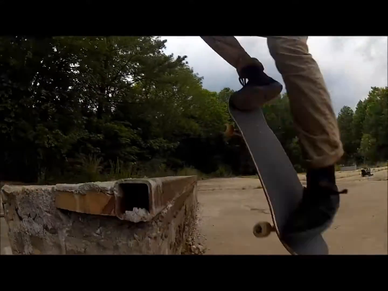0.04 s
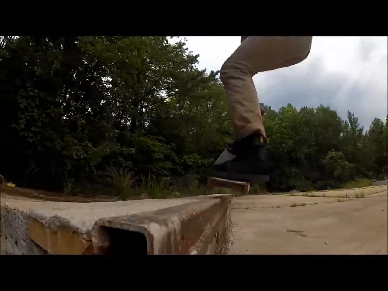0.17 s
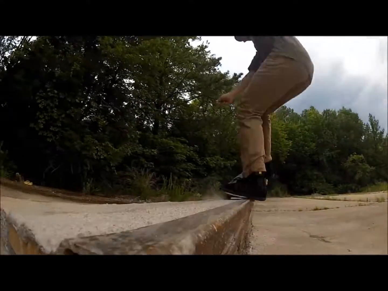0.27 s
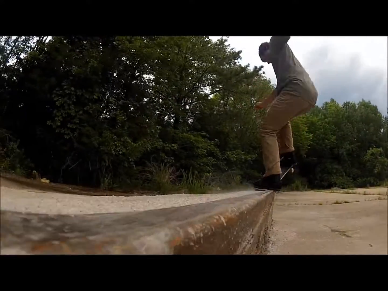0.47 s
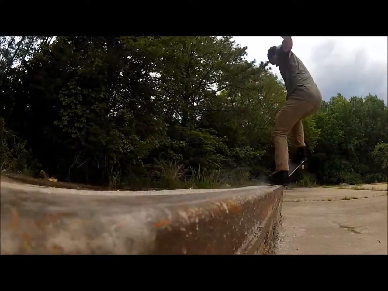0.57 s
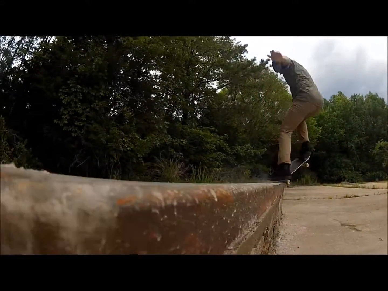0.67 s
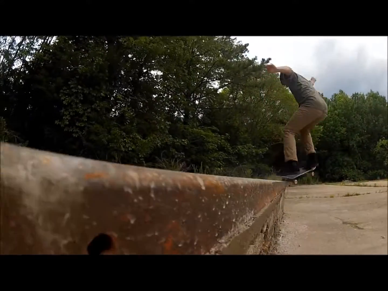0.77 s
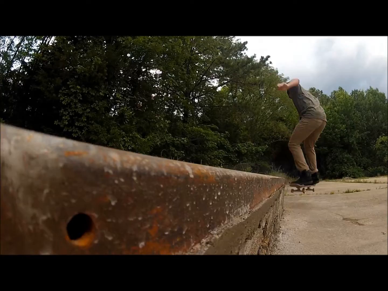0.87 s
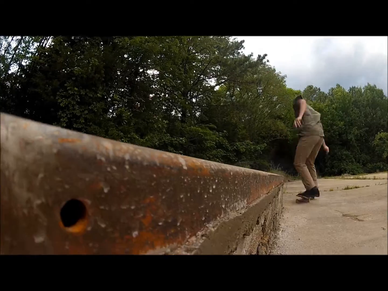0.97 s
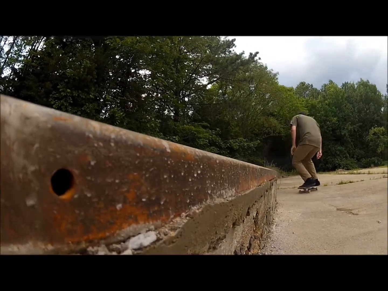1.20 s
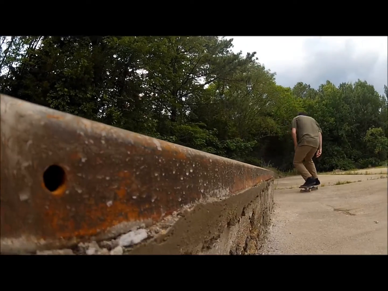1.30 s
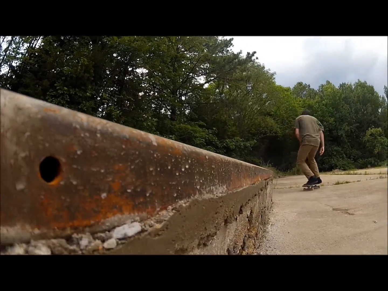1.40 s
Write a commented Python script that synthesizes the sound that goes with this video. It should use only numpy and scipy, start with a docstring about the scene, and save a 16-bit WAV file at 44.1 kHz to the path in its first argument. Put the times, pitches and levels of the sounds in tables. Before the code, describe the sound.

A skateboard slams onto a steel-edged ledge, grinds along it, then lands with a clack.

```python
"""An open yard in a light wind, one microphone near a concrete ledge with a steel edge.
A skateboard is already in the air, wheels whirring, trucks rattling. At 0.22 s truck and wheels slam
onto the steel; the grind scrapes through the board, the ledge rumbles and stick-slip makes the metal
sing. The board drops off, clacks onto the concrete at 0.95 s, bounces once and rolls away with the
tick of a pebble and a faint skid. Little comes back from the yard."""
import sys
import numpy as np
from scipy import signal
from scipy.fft import rfft, irfft
from scipy.io import wavfile

SR = 44100
rng = np.random.default_rng(int(sys.argv[2]) if len(sys.argv) > 2 else 0)


def generate_wav(sig):
    """Save sig (samples, or channels by samples) to the path in sys.argv[1] as 16-bit PCM at SR."""
    pcm = np.round(np.clip(np.atleast_2d(sig).T, -1, 1) * 32767).astype(np.int16)
    wavfile.write(sys.argv[1], SR, pcm)


N = 63945
FFT_SIZE = 81920
HZ, T = np.fft.rfftfreq(FFT_SIZE, 1 / SR) + 1e-3, np.arange(N) / SR
SLAM_S = 0.224  # first touch on the steel

# The board's resonances. Each row: frequency in Hz, width in Hz, dB over the plain sound.
BOARD_MODES = [(1129, 228, 15), (2081, 258, 13), (2262, 83, 17.5), (3472, 227, 11.5), (8420, 152, 12.5),
               (9777, 165, 17.5), (10800, 117, 14.5), (13330, 250, 16), (14300, 210, 24)]


def amp(db):
    """Decibels to gain."""
    return 10 ** (np.asarray(db) / 20)


def unit(x):
    """Scales to an rms of one."""
    return x / np.sqrt(np.mean(abs(x) ** 2) + 1e-20)


def read(points, hz):
    """Reads a table on a log-frequency axis."""
    f, value = np.transpose(points)
    return np.interp(np.log(hz + 1), np.log(f), value)


def level(points):
    """Gain along a level curve, falling 200 dB a second beyond its ends."""
    s, db = np.transpose(points)
    outside_s = np.maximum(np.maximum(s[0] - T, T - s[-1]), 0)
    return amp(np.interp(T, s, db) - 200 * outside_s)


def resonances(modes):
    """Summed response of damped modes."""
    return sum(amp(db) / (1 + 1j * (HZ ** 2 - hz ** 2) / (HZ * width)) for hz, width, db in modes)


def body(colour, modes=()):
    """Causal response of a contact colour and the modes it rings."""
    log_gain = np.log(amp(read(colour, HZ)))
    phase = -signal.hilbert(np.r_[log_gain, log_gain[-2:0:-1]]).imag[:len(HZ)]
    return np.exp(log_gain + 1j * phase) * (1 + resonances(modes))


def through(x, response):
    """Filters without changing the power of white noise."""
    return irfft(rfft(x, FFT_SIZE) * unit(response))[:N]


def drift(rate_hz):
    """Random motion up to about this rate, with an rms of one."""
    return unit(irfft(rfft(rng.standard_normal(FFT_SIZE)) / (1 + (HZ / rate_hz) ** 4))[:N])


def waver(rate_hz, depth_db):
    """Randomly wavering gain."""
    return amp(depth_db * drift(rate_hz))


def swell(s, half_s, db):
    """Bell-shaped gain that peaks at time s."""
    return amp(db) * np.exp(-((T - s) / half_s) ** 2)


def grit(smooth, grains_per_s=4500, spread_db=3):
    """Rough surfaces rubbing: tiny impacts of uneven size over smooth friction noise."""
    size = amp(spread_db * np.minimum(rng.exponential(1, N), 4))
    grains = size * rng.choice([-1, 1], N) * (rng.random(N) < grains_per_s / SR)
    return unit(grains) + smooth * rng.standard_normal(N)


def blows(rows, response, thud_hz=856, treble_hz=3000, rise_s=0.00067):
    """Each blow is a smooth push and a brief chatter of the contact, ringing one body."""
    out = np.zeros(N)
    treble = 1j * HZ / (treble_hz + 1j * HZ)
    thud = amp(1.5) / (1 + 1j * HZ / thud_hz) ** 2
    above_thud = 1j * HZ / (thud_hz + 1j * HZ)
    for s, db, decay_s, treble_db in rows:
        chatter = rng.standard_normal(N) * np.exp(-T / decay_s) * (1 - np.exp(-T / rise_s))
        force = thud + rfft(chatter / np.linalg.norm(chatter), FFT_SIZE) * above_thud
        shelf = 1 + (amp(treble_db) - 1) * treble
        sound = irfft(force * response * shelf)[:N]
        start = round(s * SR)
        out[start:] += amp(db) * sound[:N - start] / np.linalg.norm(sound)
    return out


def wind():
    """Light wind on the microphone and in the trees."""
    # The wind's spectrum. Each row: frequency in Hz, gain in dB.
    colour = [(10, -7), (35, 2), (60, -1.5), (110, -12), (300, -21), (4000, -40), (15000, -52.5)]
    # Gusts and lulls. Each row: time in seconds, level in dB.
    gusts = [(0, -51.5), (.53, -51.5), (.79, -50), (.93, -54), (1.08, -53.5), (1.16, -60.5), (1.225, -48.5),
             (1.29, -53), (1.45, -51.5)]
    return unit(through(rng.standard_normal(N), body(colour))) * level(gusts)


def yard(x, rise_s=0.0055):
    """Scatter that reaches the microphone from the ground and the trees."""
    # Each row: frequency in Hz, seconds to die away by 60 dB.
    decay = [(150, 1), (1000, 0.086), (4000, 0.54), (12000, 0.3)]
    hz, t, noise = signal.stft(rng.standard_normal(SR // 2), SR, nperseg=256)
    tail = signal.istft(noise * amp(-60 * t / read(decay, hz)[:, None]), SR, nperseg=256)[1]
    tail *= np.minimum(T[:len(tail)] / rise_s, 1)
    return signal.fftconvolve(x, tail / np.linalg.norm(tail))[:N]


def pebble(ring_hz=6000, width_hz=1100):
    """A grain of stone ticks under a wheel."""
    tick = rng.standard_normal(N) * swell(s=1.1455, half_s=0.0025, db=-56)
    return through(tick, resonances([(ring_hz, width_hz, 0)]) ** 2)


def skids():
    """The wheels slide sideways for a moment and squeal faintly."""
    # Brief slides. Each row: centre in seconds, half length in seconds, level in dB.
    slides = [(0.435, 0.024, -55), (0.526, 0.056, -54.5), (0.625, 0.013, -53), (0.669, 0.03, -62),
              (1.172, 0.0063, -62), (1.199, 0.024, -57)]
    # A sliding wheel's squeal. Each row: frequency in Hz, width in Hz, relative level in dB.
    squeal = [(3020, 410, 2.5), (4330, 370, 6), (7300, 530, -2.5)]
    pressure = sum(swell(*slide) for slide in slides)
    return through(unit(grit(smooth=0.32)) * pressure, resonances(squeal))


def spinning_wheels():
    """Free wheels whirr through the board, fading until the landing stops them."""
    # The whirr's spectrum. Each row: frequency in Hz, gain in dB.
    colour = [(80, -11), (200, -5), (500, -18.5), (1100, -9), (1550, -9), (2200, -5), (4000, -8.5),
              (6000, -17), (9000, -11.5), (12000, -32.5), (14500, -24)]
    # Its fade. Each row: time in seconds, level in dB.
    fade = [(0, -44), (.06, -47), (.13, -46), (.21, -52), (.5, -56.5), (.93, -62.5), (.96, -90)]
    whirr = unit(grit(smooth=3.2) * waver(66, depth_db=3.3)) * level(fade)
    return through(whirr, body(colour, BOARD_MODES))


def rattles():
    """Loose trucks knock lightly on the board, in the air and as it rolls off."""
    # The knocks. Each row: start in seconds, energy in dB, chatter decay in seconds, treble in dB.
    knocks = [(.001, -12.5, 0.012, -5.5), (.012, -14, 0.043, 7), (.0665, -13.5, 0.005, -5),
              (.085, -18, 0.0068, -3), (.095, -30, 0.0044, -1), (.138, -25, 0.0023, -13),
              (1.176, -25.5, 0.0053, -6), (1.345, -33.5, 0.021, -16)]
    # Their spectrum. Each row: frequency in Hz, gain in dB.
    colour = [(100, -1), (500, -2), (1300, -10.5), (2200, -5), (5500, -3), (9000, -8), (14500, -40)]
    return blows(knocks, body(colour, BOARD_MODES))


def landing():
    """The wheels clack onto the concrete, bounce once and roll away from the microphone."""
    # Wheel impacts. Each row: start in seconds, energy in dB, chatter decay in seconds, treble in dB.
    clack_blows = [(.9405, -21.5, .003, -12), (.9458, -1, 0.0026, 14), (.9485, 4, 0.0027, -3),
                   (.9525, 1.5, 0.0011, 9), (.958, -2.5, 0.0018, 10), (.9635, -6.5, 0.0089, 4)]
    bounce_blows = [(1.048, -19, 0.003, -6), (1.0575, -11.5, 0.0039, -3)]
    # The deck's ring under the rider at each touchdown. Each row: frequency in Hz, width in Hz, gain in dB.
    clack_modes = [(460, 60, 12), (1150, 70, 15), (1225, 65, 20), (1490, 28, 11), (1632, 24, 11),
                   (2165, 65, 18), (2440, 30, 7), (3560, 70, 19), (3700, 28, 19)]
    bounce_modes = [(598, 55, 24), (1009, 59, 26), (3575, 60, 22)]
    # Spectra of wheels on concrete. Each row: frequency in Hz, gain in dB.
    clack_colour = [(60, -10), (150, 2.5), (400, 4), (750, -3), (1300, -5), (2500, -2), (4000, -16.5),
                    (6000, -18.5), (9000, -12), (12000, -24), (14500, -25)]
    bounce_colour = [(100, -15), (400, -2.5), (800, -8), (2500, -3), (4000, -8), (6000, -8.5), (7500, -4.5),
                     (14500, -22)]
    roll_colour = [(80, -21), (200, 0), (500, -1.5), (1100, -12), (2200, -14), (4000, -17), (6000, -16.5),
                   (9000, -20.5), (12000, -36), (14500, -32.5)]
    # The receding roll. Each row: time in seconds, level in dB.
    roll_fade = [(.945, -62), (.96, -43.5), (1.01, -52.5), (1.1, -57), (1.2, -55.5), (1.28, -64),
                 (1.45, -64.5)]
    clack = blows(clack_blows, body(clack_colour, BOARD_MODES + clack_modes))
    bounce = blows(bounce_blows, body(bounce_colour, BOARD_MODES + bounce_modes))
    roll = unit(grit(smooth=0.59) * waver(74, depth_db=1.5)) * level(roll_fade)
    return clack + bounce + through(roll, body(roll_colour, BOARD_MODES))


def thump(hz=208, db=-31.5, swell_s=0.011):
    """The rider's weight comes down on the ledge: a low note that swells and dies."""
    age = np.maximum(T - SLAM_S, 0)
    envelope = age / swell_s * np.exp(1 - age / swell_s)
    return amp(db) * envelope * np.sin(2 * np.pi * hz * age)


def singing_metal(slip_hz=293, jitter_hz=66, sharp=0.04, settle_s=0.055, knock_decay_s=0.007):
    """Stick-slip and a few knocks keep the metal singing roughly; its pitch sinks as the truck settles."""
    # The metal's ring. Each row: frequency in Hz, relative level in dB.
    partials = [(3548, -3.5), (5060, -16.5), (6950, -16), (8450, -9.5)]
    # The drive from stick-slip and from knocks. Each row: time in seconds, level in dB.
    slip_drive = [(.228, -60), (.24, -40), (.3, -45), (.335, -58), (.366, -46), (.386, -55), (.434, -44),
                  (.46, -56), (.516, -43.5), (.55, -57), (.577, -49), (.595, -62), (.625, -52), (.66, -65),
                  (.8, -74)]
    knocks = [(0.2646, -34), (0.2817, -48), (0.298, -52)]
    knocked = sum(amp(db) * (T > s) * np.exp(-abs(T - s) / knock_decay_s) for s, db in knocks)
    bend = 1 + sharp * np.exp(-np.maximum(T - SLAM_S, 0) / settle_s)
    ring = np.zeros(N)
    for hz, db in partials:
        turns = np.cumsum(hz * bend + jitter_hz * drift(slip_hz)) / SR
        roughness = waver(slip_hz, depth_db=2) * waver(21, depth_db=0.5)
        ring += amp(db) * np.sin(2 * np.pi * turns) * roughness
    return unit(ring) * (level(slip_drive) + knocked)


def grind():
    """The truck slams on the steel edge and scrapes along it; the same friction makes the ledge rumble."""
    # The slam. Each row: start in seconds, energy in dB, chatter decay in seconds, treble in dB.
    slam_blows = [(.224, -13, 0.0011, 6), (.2265, 4.5, 0.0021, 8.5), (.228, 5, .0016, 0),
                  (.2328, 3, 0.0027, 8.5), (.238, -15, 0.0028, -8), (.2425, -4, 0.0059, -4),
                  (.249, 0.5, 0.0064, 7)]
    # The steel edge's ring. Each row: frequency in Hz, width in Hz, gain in dB.
    edge_modes = [(374, 55, 15), (808, 56, 7), (1246, 29, 5), (1340, 62, 6.8), (1860, 24, 10.7),
                  (2880, 170, 7.8), (3360, 26, 8.5), (3660, 43, 18.3), (4590, 310, 5.8)]
    # Spectra of the contact. Each row: frequency in Hz, gain in dB.
    slam_colour = [(60, -3), (130, 6), (250, 4.5), (600, 2), (1200, 1.5), (2500, -1.5), (4300, -2.5),
                   (6000, -14), (7600, 1), (10000, -16.5), (12000, -21.5), (14500, -25)]
    scrape_colour = [(100, -15.5), (380, 6), (600, -5.5), (730, -3.5), (1200, -4), (1600, -7.5),
                     (2200, -4.5), (2700, -10), (4400, -12), (6000, -20), (7600, -14), (10000, -17),
                     (12000, -27), (14500, -27)]
    rumble_colour = [(60, -6), (130, -6.5), (190, 1), (280, -1.5), (400, -7), (800, -48), (2000, -59.5)]
    # Surges along the ledge. Each row: time in seconds, level in dB.
    scrape_curve = [(.225, -68), (.24, -43.5), (.31, -47.5), (.375, -40), (.45, -44), (.53, -46.5),
                    (.6, -63), (.63, -55), (.68, -52.5), (.73, -60.5), (.78, -62)]
    rumble_curve = [(.225, -68), (.26, -44.5), (.3, -50), (.38, -44), (.44, -52), (.53, -48), (.61, -61.5),
                    (.72, -51.5), (.8, -70.5), (.9, -73)]
    slam = blows(slam_blows, body(slam_colour, BOARD_MODES + edge_modes))
    friction = unit(grit(smooth=0.43) * waver(100, depth_db=2.26))
    scrape = through(friction * level(scrape_curve), body(scrape_colour, BOARD_MODES))
    rumble = unit(through(friction, body(rumble_colour))) * level(rumble_curve)
    return slam + scrape + rumble


def scene():
    """At the microphone: the skateboard up front, the yard faint behind it, and the wind."""
    skate = spinning_wheels() + rattles() + grind() + thump() + singing_metal()
    skate += landing() + skids() + pebble()
    return (skate + amp(-15.5) * yard(skate) + wind())[None]


def record(dry, cut_hz=15450):
    """The recorder's band limit."""
    lowpass = signal.firwin(401, cut_hz, window=("kaiser", 8), fs=SR)
    return signal.oaconvolve(dry, lowpass[None], "same")


dry = scene()
out = record(dry)
generate_wav(out)
```